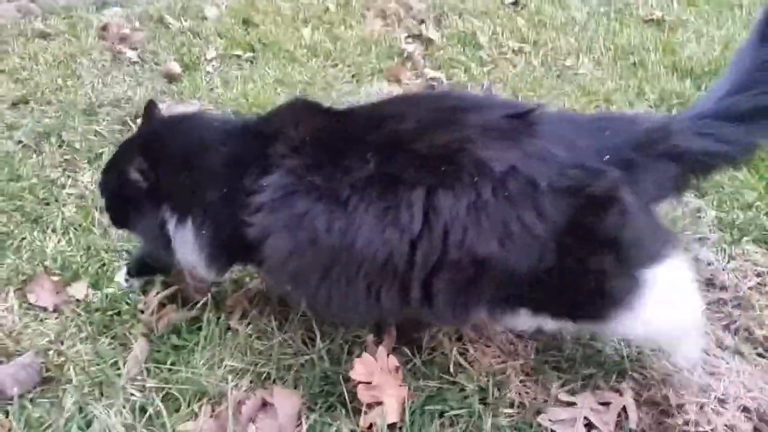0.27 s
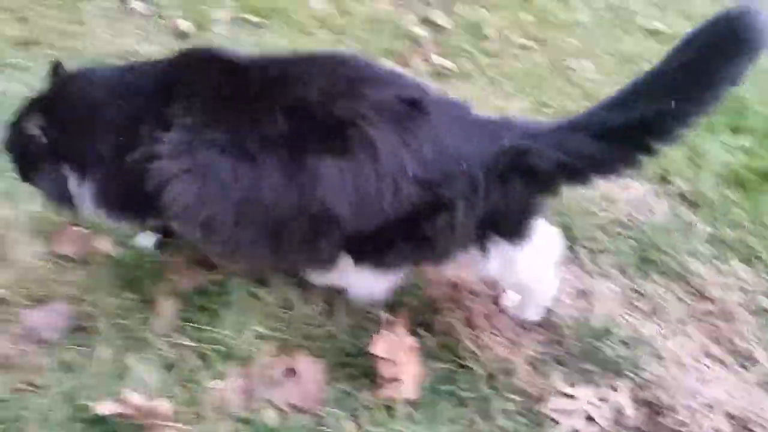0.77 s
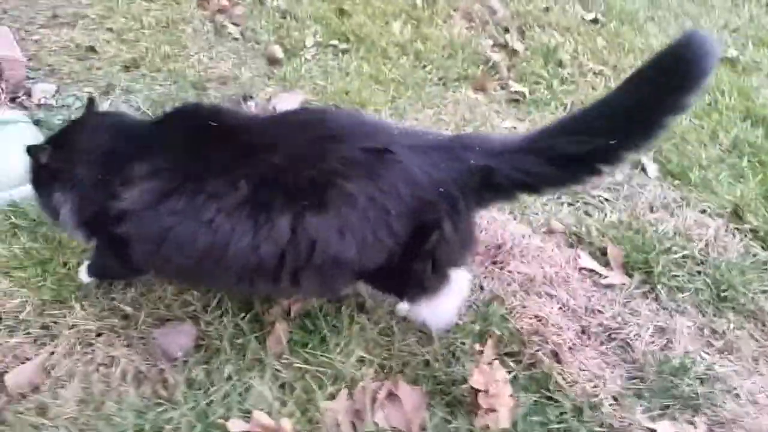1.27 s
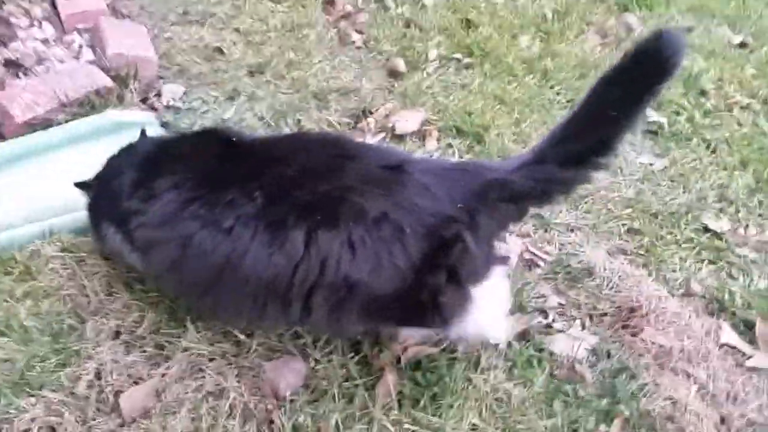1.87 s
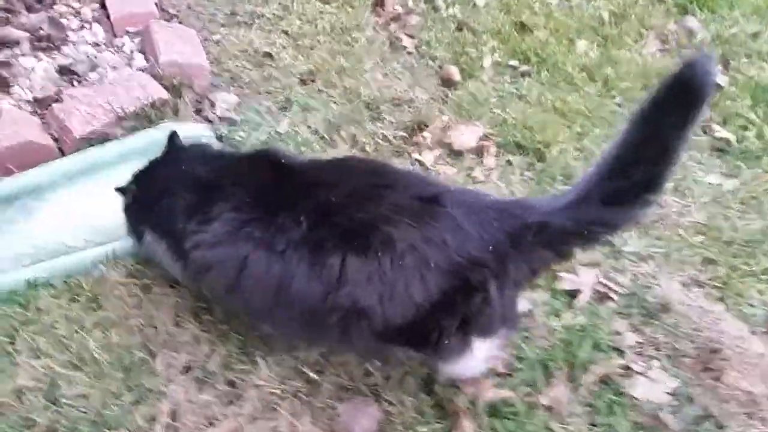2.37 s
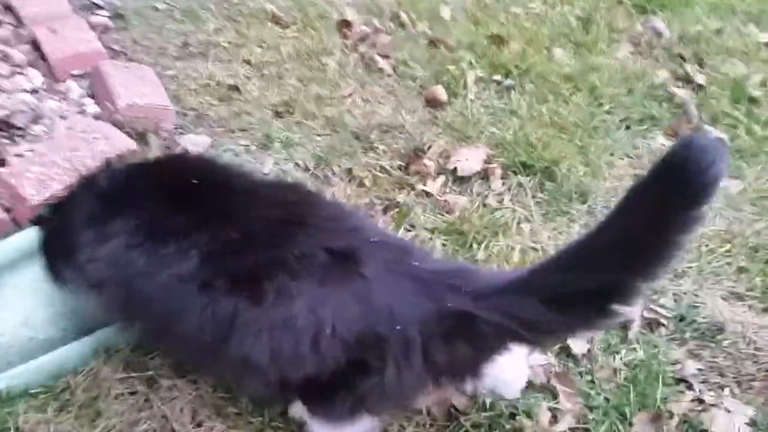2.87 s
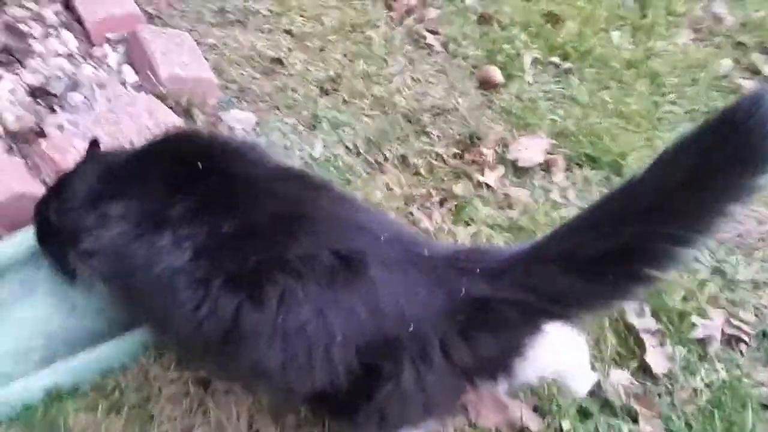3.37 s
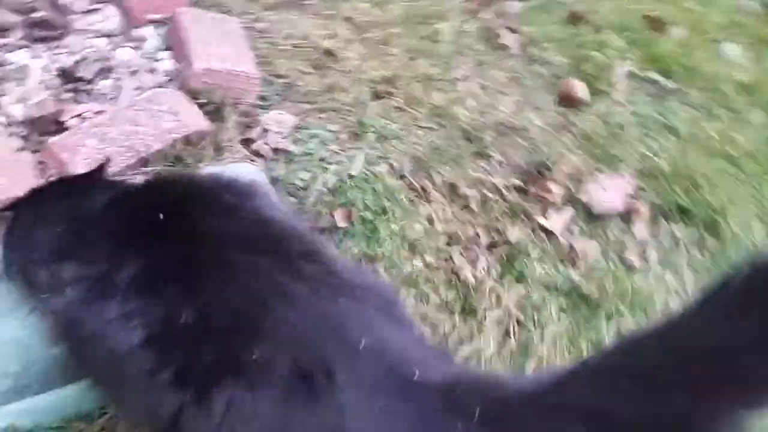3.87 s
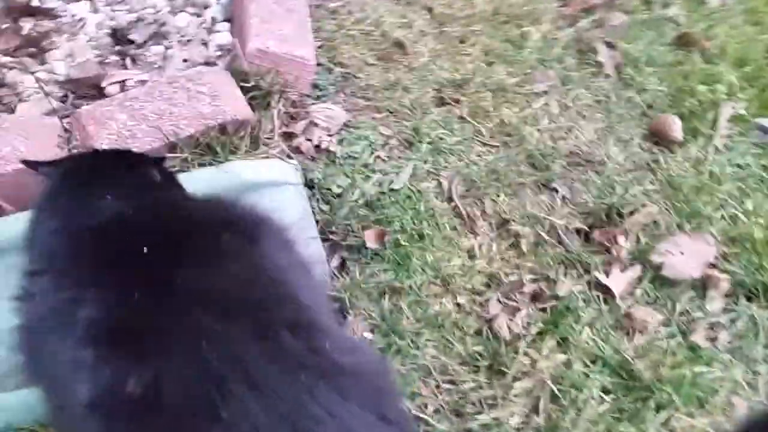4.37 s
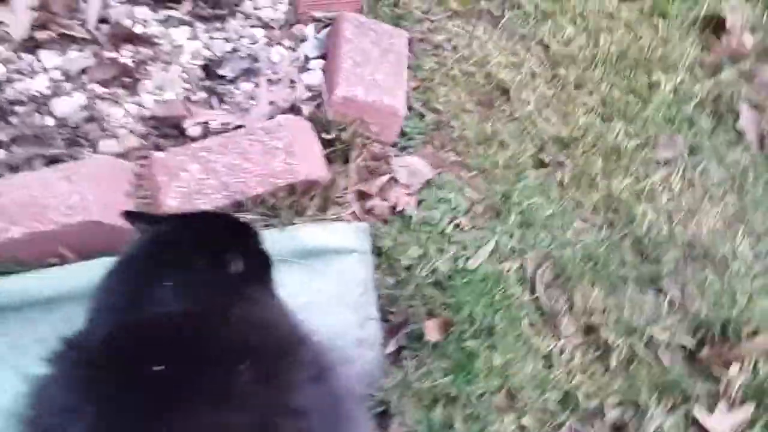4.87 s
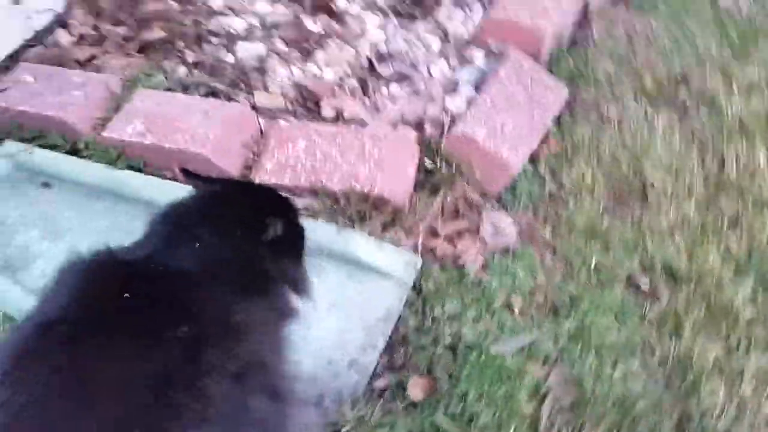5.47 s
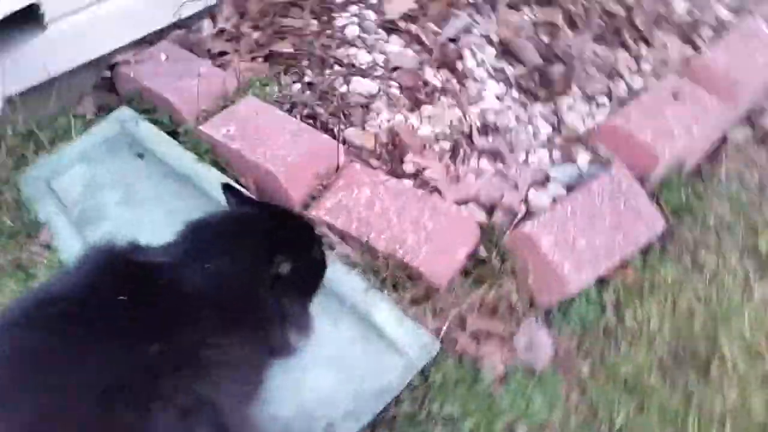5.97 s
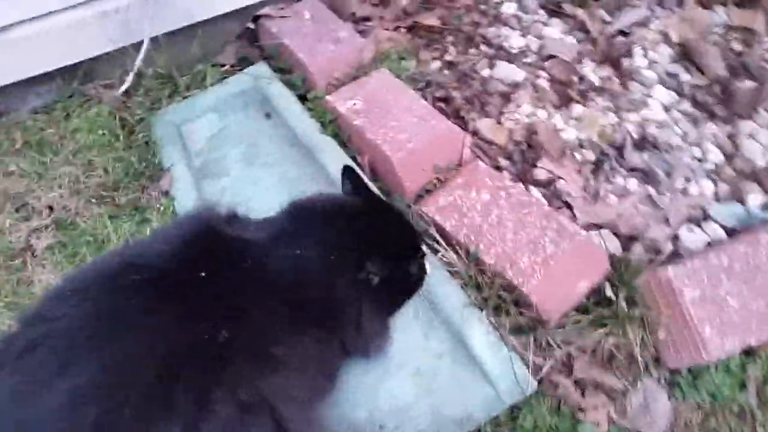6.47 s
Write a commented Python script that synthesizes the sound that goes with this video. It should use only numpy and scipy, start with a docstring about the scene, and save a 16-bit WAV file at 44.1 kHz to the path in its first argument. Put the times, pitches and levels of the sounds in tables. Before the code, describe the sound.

On an open lawn, a small mew fades within half a second, leaving low rumble and faint hiss. Bright, brittle footfalls follow in uneven clusters, brushing grass blades, pressing matted thatch, snapping stems and crumpling leaves. Wind buffets the handheld phone softly, shifting between left and right. The steps thin out, with a last small crackle at the end.

```python
"""A mew and footsteps on dry grass

A cat mews once, and someone with a phone treads on dry grass and leaves.
Each step is a swarm of tiny blade clicks over a duller crunch of pressed thatch (the matted dead grass).
Stalks snap as single sharp clicks, leaves crumple as crackling bursts, and the mew is a sum of harmonics.
Wind noise buffets two microphone ports, each with its own colour, over a steady outdoor rumble and hiss."""
import sys
import numpy as np
from scipy import signal
from scipy.fft import rfft, irfft
from scipy.io import wavfile
from scipy.ndimage import uniform_filter1d

SR = 44100
rng = np.random.default_rng(int(sys.argv[2]) if len(sys.argv) > 2 else 0)


def output_pcm(signal):
    """Save a mono or channel-first signal as 16-bit PCM at the path in sys.argv[1].

    Samples are clipped to [-1, 1] before scaling.
    """
    pcm = np.clip(np.atleast_2d(signal).T, -1, 1) * 32767
    wavfile.write(sys.argv[1], SR, np.round(pcm).astype(np.int16))


N = 297234
TIME = np.arange(N) / SR

# Levels in the tables come before the gains and filters in the functions.
# Balance means left minus right.

# footfalls and shuffles: (weight lands [s], hold [s], rise [s], fall [s],
# rustle of blades [dB], crunch of thatch [dB], sheen relative to the rustle [dB])
STEPS = [(0.27, 0.057, 0.057, 0.15, -59, -59.5, 3.5), (1.147, .07, 0.051, 0.057, -56.5, -82, 5),
         (1.342, 0.13, 0.0018, 0.035, -40, -50.5, -1.5), (1.51, 0.071, 0.034, 0.025, -31.5, -42.5, -2),
         (1.646, 0.082, 0.15, 0.14, -43.5, -53, -0.5), (2.267, 0.026, 0.037, 0.02, -30.5, -54.5, -4),
         (2.34, 0.16, 0.22, 0.019, -35, -51.5, -2.5), (2.53, 0.03, 0.012, 0.015, -26.5, -41, -12),
         (2.604, 0.21, 0.018, 0.15, -39.5, -51.5, -6), (3.053, 0.039, 0.057, 0.085, -44, -58.5, 0.5),
         (3.447, 0.018, 0.023, 0.044, -39.5, -54, -1), (3.595, 0.1, 0.066, 0.053, -31.5, -47.5, 1),
         (3.745, 0.011, 0.016, 0.069, -28.5, -46.5, 0), (3.913, .04, 0.07, .1, -43, -55.5, -3.5),
         (4.17, 0.05, 0.04, .024, -24, -39, -8), (4.384, 0.016, 0.0089, 0.016, -30.5, -43.5, -6),
         (4.44, 0.063, 0.041, 0.028, -28, -42.5, -5), (4.611, 0.17, 0.058, 0.031, -41.5, -55, -4.5),
         (5.14, 0.041, 0.053, 0.034, -63, -57.5, 5), (5.274, 0.064, 0.15, .03, -42.5, -59.5, 2),
         (5.428, 0.02, 0.07, 0.026, -26.5, -44.5, -4.5), (5.49, 0.022, .01, 0.011, -29, -56, -6),
         (5.547, .03, .02, 0.17, -50.5, -61, -5), (5.911, 0.1, 0.015, 0.072, -47.5, -59.5, 6),
         (6.197, 0.028, .03, 0.02, -46, -61.5, -2), (6.694, .07, 0.077, .05, -44, -59, 0)]
# stalks and leaf edges breaking: (time [s], click level [dB], balance [dB])
SNAPS = [(1.171, -30, 0), (1.342, -21, -12), (1.481, -11.5, -3), (1.5264, -5.5, 5), (1.582, -12, 1),
         (1.718, -14, -6), (1.778, -15.5, -2), (2.2625, -5.5, -7), (2.27, -11, -10), (2.281, -8.5, -14),
         (2.6268, -13, 0), (2.7084, -12, 14), (3.1014, -15, -4), (3.5957, -15, -3), (3.6897, -13, -6),
         (3.7555, -4, 0), (3.8372, -5.5, -21), (3.9164, -7.5, -3), (3.9704, -20, 7), (4.203, -6, 2),
         (4.377, -19, 2), (4.429, -9, 15), (4.497, -5, 12), (4.52, -7, -1), (4.6487, -17, 7),
         (5.1315, -20, -7), (5.4354, -9.5, -9), (5.48, -5.5, -2), (5.581, -21, 7), (6.654, -21.5, -10),
         (6.6935, -13, -2)]
# dry leaves and clumps giving way under the sole: (time [s], peak level [dB], pitch [Hz], decay [s])
CRUMPLES = [(.028, -25, 332, 0.019), (1.386, -29.5, 4770, 0.012), (1.502, -32.5, 1020, 0.008),
            (1.522, -29, 1400, .006), (2.235, -33, 2000, 0.25), (2.534, -19.5, 5410, 0.012),
            (2.625, -29, 1400, 0.0045), (2.674, -32, 3900, 0.012), (2.827, -34.5, 790, .0079),
            (2.707, -35, 2600, .005), (2.923, -47, 4300, 0.0027), (3.454, -31.5, 4840, 0.045),
            (3.863, -35, 900, 0.0039), (4.116, -33.5, 1450, 0.017), (4.385, -24.5, 2050, .006),
            (5.279, -37, 5330, 0.039), (5.404, -33.5, 396, 0.0027), (5.47, -29.5, 4630, .006),
            (5.493, -29, 1450, 0.0035), (6.045, -38.5, 4430, .002), (6.691, -34.5, 4300, .005)]
# the mew: (time [s], pitch [Hz], level [dB], mouth resonance [Hz])
MEW = [(0, 488, -55, 2560), (.06, 540, -50.5, 2380), (.125, 543, -48.5, 2340), (.175, 527, -50, 2260),
       (.245, 516, -54, 2060), (.285, 467, -58.5, 1520), (.305, 438, -55, 450), (.34, 393, -48.5, 380),
       (.375, 298, -55, 278)]
# gusts at the ports: (arrival [s], hold [s], level [dB], balance [dB])
GUSTS = [(1.511, 0.033, -34, 21), (1.57, 0.02, -35, -4), (1.696, 0.14, -33.5, -6), (1.88, 0.11, -39.5, -3),
         (2.074, 0.034, -29.5, 0), (2.153, 0.086, -33, -4), (2.229, 0.054, -30, 23), (2.345, 0.04, -29, 19),
         (2.413, 0.16, -34.5, 8), (2.642, 0.3, -37.5, 7.5), (3.095, 0.097, -37, -4),
         (3.281, 0.044, -36, -1.5)]
# single eddies striking a port: (time [s], level [dB], balance [dB], pitch [Hz])
EDDIES = [(0.36, -28, -1, 140), (0.54, -25.5, 1, 101), (.591, -25, 26, 111), (1.313, -18.5, -28, 122),
          (1.695, -22, -23, 79.5), (1.863, -21.5, -12, 92), (1.96, -18, -27, 90), (2.102, -13, 21.5, 110),
          (2.24, -17, 32, 132), (2.339, -22.5, 24, 155), (2.265, -25.5, 18, 210), (2.363, -20.5, 24, 180),
          (2.888, -19, 29, 87), (3.267, -20.5, 6, 87), (3.848, -28.5, -10, 86), (4.507, -24.5, 18, 104)]

# Tone colours: only the shape counts, because the filter evens out the overall power.
# rustle of dry blades at each port: (frequency [Hz], left [dB], right [dB])
BLADE_COLOUR = [(990, -36, -42), (2960, -28, -31), (4020, -16, -27), (6340, -16, -30), (8100, -15.5, -20),
                (9370, -6.5, -12), (10480, -15.5, 1), (11040, -7.5, 4.5), (13040, -10.5, -0.5),
                (16300, -8, -11.5)]
# pressed thatch: (frequency [Hz], left [dB], right [dB])
THATCH_COLOUR = [(120, -14.5, -13.5), (358, 7.5, 8), (570, 3.5, 4), (950, 7, 8.5), (2200, 5.5, 8),
                 (3020, 5.5, 0), (4720, 11.5, -2.5), (8300, -4.5, -28)]
# turbulence in a port: (frequency [Hz], left [dB], right [dB])
BUFFET_COLOUR = [(15, -28.5, -11), (40.8, -0.5, -9), (81.3, 5, 6.5), (162, -6, -13), (224, -25.5, -31.5),
                 (402, -43, -34), (870, -47.5, -62)]
# distant rumble and air: (frequency [Hz], left [dB], right [dB])
AIR_COLOUR = [(18, -15, -18.5), (40.5, 2, -6.5), (78.5, 0, 3), (123.7, 2, 0.5), (169, -9.5, -8),
              (230.7, -13.5, -8), (242.4, 0, -9.5), (285, -15, -17.5), (394, -20, -20.5),
              (950, -22.5, -25.5), (1350, -31, -36.5), (1810, -32, -33), (2810, -43.5, -45.5),
              (7000, -55, -68)]
# microphone hiss, peaking at the resonance of each port: (frequency [Hz], left [dB], right [dB])
HISS_COLOUR = [(1510, -24.5, -8), (3070, -18.5, -23.5), (3890, -2.5, -19), (4290, 3, -22),
               (5340, -9.5, -25), (6500, -33, -38), (8160, -36, -36), (9800, -21, -25), (10500, -16, -7.5),
               (13600, -21, -26), (17000, -7, -4.5)]

STIR_DB = -64.5  # grass that keeps stirring between steps, before the blade gain
SHEEN_LOW_HZ, SHEEN_HIGH_HZ = 11330, 13600  # the band whose strength changes from step to step
GUST_RISE_S, GUST_FALL_S = 0.044, 0.031
# the background is fuller until the dip; the whole sound dips briefly
FULLER_DB, DIP_S, DIP_DB, DIP_WIDTH_S = 3.3, .629, -10, 0.008
TOP_HZ = 15900  # highest frequency the phone lets through


def footsteps(blade_db=2.5, thatch_db=1, scatter_db=-4):
    """Blades flick past the shoe and thatch is crushed below it; both catch and slip together."""
    # powers of the steps add up, so the weight is squared
    weight = np.array([swell(*step[:4]) for step in STEPS]) ** 2
    *_, rustle_db, crunch_db, sheen_db = np.transpose(STEPS)
    stir = undb(STIR_DB) ** 2 * (TIME > STEPS[0][0])
    rustle = np.sqrt(undb(rustle_db) ** 2 @ weight + stir)
    sheen = np.sqrt(undb(rustle_db + sheen_db) ** 2 @ weight + stir)
    crunch = np.sqrt(undb(crunch_db) ** 2 @ weight)

    flicks = grains(per_s=2200, spread_db=2.0, ceiling_db=9.5)
    stems = tufts(per_s=3000, spread_db=1.5, ceiling_db=4, flicker_db=4.0,
                  lo_hz=2390, hi_hz=17200, count=6)
    blades = colour(unit(flicks + stems), BLADE_COLOUR)
    # filtering both ways keeps the top in step, so it can be subtracted
    sheen_filter = signal.butter(2, (SHEEN_LOW_HZ, SHEEN_HIGH_HZ), "band", fs=SR, output="sos")
    top = signal.sosfiltfilt(sheen_filter, blades)
    rustling = (blades - top) * rustle + top * sheen

    crush = tufts(per_s=1200, spread_db=4.5, ceiling_db=10, flicker_db=4.0,
                  lo_hz=201, hi_hz=18650, count=9)
    # sound scattered by the ground and the legs reaches the two ports unrelated
    scattered = undb(scatter_db) * noise(0)
    thatch = colour(unit(crush + scattered), THATCH_COLOUR)
    return slips() * (rustling * undb(blade_db) + thatch * crunch * undb(thatch_db))


def slips(per_s=110, decay_s=0.0079, steady=2.4):
    """Tufts catch on the shoe and let go: each release starts at once and dies away, over steady brushing."""
    releases = (rng.random(N) < per_s / SR) * rng.uniform(.2, 1, N)
    keep_per_sample = np.exp(-1 / (decay_s * SR))
    release_decays = unit(signal.lfilter([1], [1, -keep_per_sample], releases))
    return unit(steady + release_decays)


def tufts(per_s, spread_db, ceiling_db, flicker_db, lo_hz, hi_hz, count):
    """Stalks of different sizes: each size clicks in its own band and comes and goes by itself."""
    edges = np.geomspace(lo_hz, min(hi_hz, .45 * SR), count + 1)
    out = 0
    for band in zip(edges, edges[1:]):
        clicks = grains(per_s, spread_db, ceiling_db) * undb(flicker_db * walk(rate=45))
        out = out + signal.sosfilt(band_filter(band), clicks)
    return unit(out)


def grains(per_s, spread_db, ceiling_db, scatter_db=3, max_lag_samples=10):
    """Random clicks, many small and few large; each reaches the right port with its own lag and strength."""
    out = np.zeros((2, N))
    at = np.flatnonzero(rng.random(N) < per_s / SR)
    sign_draw, size_draw, bearing_draw = rng.random((N // 4, 3))[:len(at)].T
    size_db = np.minimum(-spread_db * np.log(size_draw), ceiling_db)
    click = np.sign(sign_draw - .5) * undb(size_db)
    bearing = 2 * bearing_draw - 1
    lag = np.round(max_lag_samples * bearing).astype(int)
    left, right = click * sides(scatter_db * bearing)
    out[0, at] = left
    out[1, (at + lag) % N] = right
    return unit(out)


def snaps(fibre_db=-13, fibre_s=0.0018):
    """A stalk breaks with one sharp click, and its fibres tear just after."""
    out, t = np.zeros((2, N)), TIME[:SR // 50]
    for s, db, balance_db in SNAPS:
        crack = undb(fibre_db) * rng.standard_normal((2, len(t))) * np.exp(-t / fibre_s)
        crack[:, 0] = 1  # the click itself
        add(out, s, crack * undb(db) * sides(balance_db))
    return colour(out, BLADE_COLOUR)


def crumples(gain_db=-1, octaves=0.34, crackle_db=5.0, left_db=12, rise=0.19):
    """A collapsing leaf or clump gives a crackling burst; the higher ones favour the left port."""
    out, t = np.zeros((2, N)), TIME[:SR // 3]
    for s, db, hz, decay_s in CRUMPLES:
        edges = np.minimum(hz * 2 ** (np.array([-1, 1]) * octaves), .45 * SR)
        folds = rng.standard_normal((2, len(t))) * undb(crackle_db * walk(rate=530)[:len(t)])
        # the rise takes a fixed share of the decay time
        collapse = np.minimum(t / (rise * decay_s), 1) * np.exp(-t / decay_s)
        burst = signal.sosfilt(band_filter(edges), folds * collapse)
        burst = burst / abs(burst).max()
        add(out, s, burst * undb(db + gain_db) * sides(left_db * (hz > 3000)))
    return out


def mew(gain_db=1.5, mouth_width_hz=380, head_hz=2950, head_width_hz=650, head_db=-12.5,
        chest_db=-12, jitter=0.006, shimmer_db=2.5, count=7):
    """Voice harmonics pass a mouth resonance that sinks as the jaw closes; the end turns rough."""
    hz, level_db, mouth_hz = curves(MEW)
    order = np.arange(1, count + 1)[:, None]
    partial_hz = order * hz
    opening = np.clip(mouth_hz / 2200, 0, 1) ** 2
    # pitch shakes more as the mouth closes
    shaken_hz = hz * (1 + jitter * walk(rate=240) / (opening + 0.083))
    phase = 2 * np.pi * np.cumsum(shaken_hz) / SR
    mouth = 1 / (1 + (2 * (partial_hz - mouth_hz) / mouth_width_hz) ** 2)
    head = undb(head_db) / (1 + (2 * (partial_hz - head_hz) / head_width_hz) ** 2)
    chest = undb(chest_db) / np.sqrt(order)
    # the closing jaw muffles the head resonance faster than the chest sound
    gains = mouth + opening ** 2 * head + opening * chest
    shimmer = undb(shimmer_db * np.array([walk(rate=60) for _ in order]))
    voice = np.sum(gains * shimmer * np.sin(order * phase), axis=0)
    # even out the power, so that the level comes from the table
    voice = voice / np.sqrt(np.sum(gains ** 2, axis=0) / 2)
    fade = np.clip((MEW[-1][0] - TIME) / 0.011, 0, 1)
    return bounced(voice * undb(level_db + gain_db) * fade)


def bounced(x, lag_s=.005, sway_s=.0001, echo_db=-11, port_s=.00008):
    """Direct sound, later at the right port, plus a reflection whose path sways as the phone moves."""
    def late(s):
        return np.interp(TIME - s, TIME, x)

    ports = []
    for port_delay_s in (0, port_s):
        # the reflection sways separately at each port
        echo = undb(echo_db) * late(lag_s + sway_s * walk(rate=6.3))
        ports.append(late(port_delay_s) + echo)
    return np.array(ports)


def wind(gust_db=0.5, flutter_db=2.5, eddy_db=-2.0, eddy_s=0.0048, burble_db=-6.5,
         burble_hz=178, strong_db=-26, burble_growth=0.99):
    """Gusts stir each port separately, strong ones shed smaller vortices; single eddies give soft bumps."""
    power = 0
    for s, hold_s, db, balance_db in GUSTS:
        gust = swell(s, hold_s, GUST_RISE_S, GUST_FALL_S) * undb(db) * sides(balance_db)
        power = power + gust ** 2
    blowing = np.sqrt(power)
    force = blowing * undb(gust_db + flutter_db * walk(rate=36))
    vortices = band_filter([burble_hz / np.sqrt(2), burble_hz * np.sqrt(2)])
    burble = unit(signal.sosfilt(vortices, noise(0))) * undb(burble_db)
    # stronger wind raises the share of burble
    burble = burble * (blowing / undb(strong_db)) ** burble_growth
    out = force * (colour(noise(0), BUFFET_COLOUR) + burble)
    t = TIME[:SR // 12]
    for s, db, balance_db, hz in EDDIES:
        bump = t / eddy_s * np.exp(1 - t / eddy_s) * np.sin(2 * np.pi * hz * t)
        add(out, s, bump * undb(db + eddy_db) * sides(balance_db))
    return out


def outdoors(air_db=-42.0, hiss_db=-54.5, swell_db=.5, shared_hz=650):
    """Distant rumble, alike at both ports in the bass only, with the steady hiss of the microphones."""
    low = signal.butter(2, shared_hz, "low", fs=SR, output="sos")
    high = signal.butter(2, shared_hz, "high", fs=SR, output="sos")
    field = signal.sosfilt(low, noise(likeness=0.88)) + signal.sosfilt(high, noise(0))
    air = colour(field, AIR_COLOUR) * undb(air_db + swell_db * walk(rate=8.3))
    return air + colour(noise(0), HISS_COLOUR) * undb(hiss_db)


def swell(s, hold_s, rise_s, fall_s):
    """Envelope that grows to 1 at time s, holds and dies away."""
    before = np.maximum(s - TIME, 0)
    after = np.maximum(TIME - s - hold_s, 0)
    return np.exp(-before / rise_s - after / fall_s)


def noise(likeness):
    """White noise at two ports, partly shared: likeness 0 is unrelated, 1 is identical."""
    share = np.clip(likeness, 0, 1)
    return np.sqrt(share) * rng.standard_normal(N) + np.sqrt(1 - share) * rng.standard_normal((2, N))


def walk(rate):
    """Smooth random wandering of rms 1, with a new target rate times a second."""
    k = max(int(SR / rate), 1)
    targets = np.repeat(rng.standard_normal(N // k + 1), k)
    return unit(uniform_filter1d(targets, k)[:N])


def colour(x, table, size=8192):
    """Causal filter of unit power gain, drawn through the points of a tone colour table."""
    hz, *ports = np.transpose(table)
    grid = np.log(np.maximum(np.fft.rfftfreq(size, 1 / SR), 1))
    gains = undb([np.interp(grid, np.log(hz), db) for db in ports])
    # folding the cepstrum (transform of the log gains) makes the response start at once
    cepstrum = irfft(np.log(gains))
    cepstrum[:, 1:size // 2] *= 2
    cepstrum[:, size // 2 + 1:] = 0
    response = unit(irfft(np.exp(rfft(cepstrum)))) / np.sqrt(size)
    return signal.fftconvolve(x, response, axes=1)[:, :N]


def band_filter(edges_hz):
    """Filter that passes the sound between two frequencies."""
    return signal.butter(2, edges_hz, "band", fs=SR, output="sos")


def sides(balance_db):
    """Left and right gains of constant power."""
    gains = undb(np.array([[.5], [-.5]]) * balance_db)
    return gains / np.sqrt(np.mean(gains ** 2, axis=0))


def add(out, s, sound):
    """Mix a short stereo sound in at time s."""
    i = int(np.clip(s * SR, 0, N - 1))
    out[:, i:i + sound.shape[1]] += sound[:, :N - i]


def curves(table):
    """The columns of a time table, one value a sample."""
    s, *columns = np.transpose(table)
    return [np.interp(TIME, s, c) for c in columns]


def undb(db):
    """Decibels to gain."""
    return 10 ** (np.asarray(db) / 20)


def unit(x):
    """Scale to rms 1."""
    return x / np.sqrt(np.mean(x ** 2))


def scene():
    """Everything heard on the lawn, with one brief dip in level."""
    backdrop = outdoors() * undb(FULLER_DB * (TIME < DIP_S))
    dip = undb(DIP_DB * np.exp(-((TIME - DIP_S) / DIP_WIDTH_S) ** 2))
    return (footsteps() + snaps() + crumples() + mew() + wind() + backdrop) * dip


def record(dry):
    """The phone cuts the top with a steep low-pass filter."""
    # order 10, ripple .2 dB, stop band 80 dB down
    low_pass = signal.ellip(10, .2, 80, TOP_HZ, fs=SR, output="sos")
    return signal.sosfilt(low_pass, dry)


dry = scene()
out = record(dry)
output_pcm(out)
```